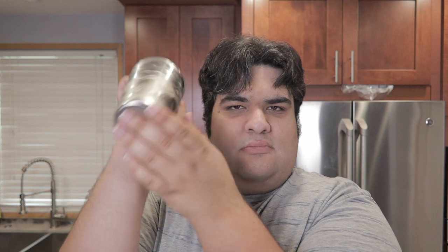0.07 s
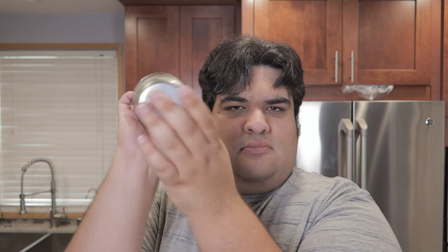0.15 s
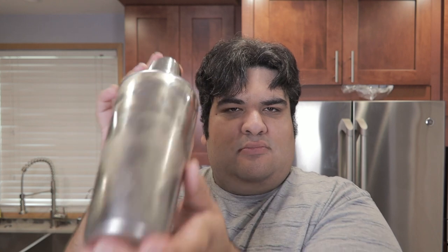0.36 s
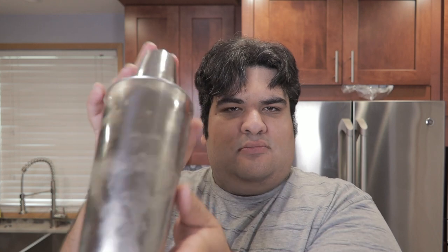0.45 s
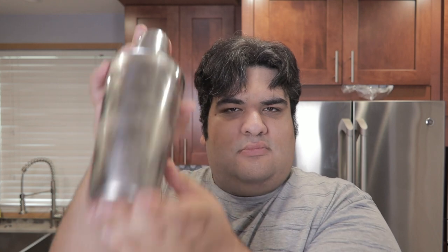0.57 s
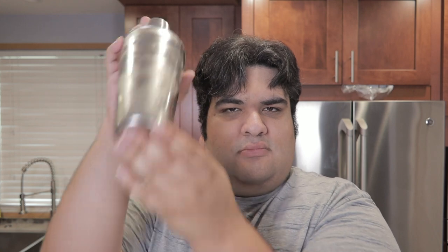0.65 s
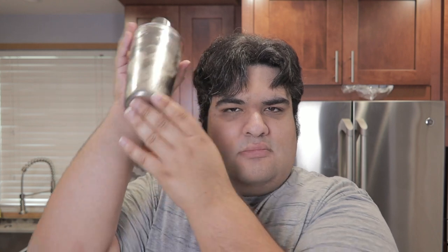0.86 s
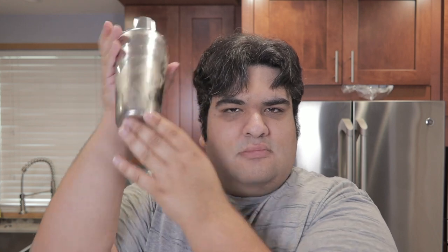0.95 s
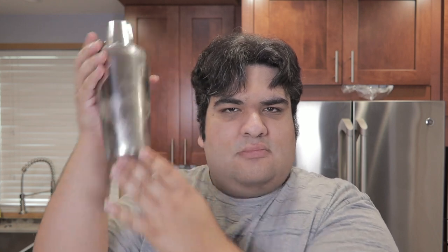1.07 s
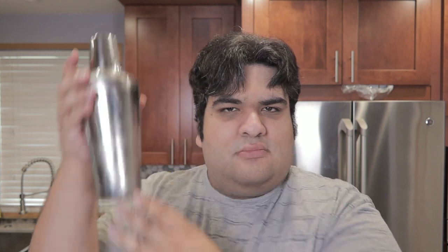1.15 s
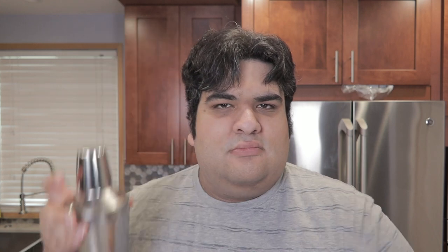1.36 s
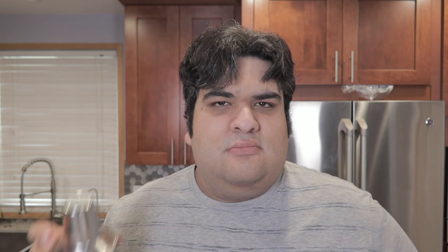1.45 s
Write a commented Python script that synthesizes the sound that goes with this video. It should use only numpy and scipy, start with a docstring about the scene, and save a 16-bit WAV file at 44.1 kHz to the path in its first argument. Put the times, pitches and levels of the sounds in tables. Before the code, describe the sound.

A metal cocktail shaker of ice is swung back and forth right by the microphone in a kitchen. Two loud, rattling crashes with a brief steel ring give way to softer clacks, over a faint hum.

```python
"""Kitchen, with the microphone close to a steel cocktail shaker full of ice, swung to and fro.
The ice crashes into one end and tumbles, slams into the ringing steel, then clacks about more gently.
Hard walls answer every hit; faint room noise and an appliance hum sit far behind.
At this distance the loudest slams overload the recorder."""
import sys
import numpy as np
from scipy import signal
from scipy.fft import rfft
from scipy.io import wavfile
from scipy.ndimage import uniform_filter1d

SR = 44100
rng = np.random.default_rng(int(sys.argv[2]) if len(sys.argv) > 2 else 0)


def store_wav(level_fs):
    """Save 16-bit WAV to argv[1]."""
    pcm = np.round(np.clip(np.atleast_2d(level_fs), -1, 1) * 32767)
    wavfile.write(sys.argv[1], SR, pcm.T.astype(np.int16))


N = 66150
LEAD_S = 0.1  # the mix starts early, so a slam is already ringing at time zero

# spectrum of the room noise: frequency_hz, gain_db
ROOM_SPECTRUM = [(20, -16.5), (40, -12.5), (57, 6), (70, -5), (120, -4.5), (180, -5.5), (280, 0.5),
                 (400, 3.5), (700, -9), (1600, -3), (4000, -10), (8000, -27.5), (16000, -35.5)]
# steady tones of a kitchen appliance: pitch_hz, level_db
APPLIANCE_TONES = [(58, -76), (120, -80.5), (236, -70), (290, -70)]
# reverberation of the kitchen: frequency_hz, t60_s, gain_db
REVERB_BANDS = [(120, 0.92, -19.5), (496, 0.29, -7.5), (1425, 0.47, -6.5), (3000, 0.42, -6.5),
                (3900, 0.55, -8.5), (4430, 0.52, -4.5), (7000, 0.47, -12), (11000, 0.3, -11),
                (14500, .3, -15)]
# dull low bumps under the shaking: start_s, length_s, level_db
LOW_BUMPS = [(.21, 0.13, -60.5), (.53, 0.069, -63), (1.2, .14, -65)]
# spectrum of a bump: frequency_hz, gain_db
BUMP_SPECTRUM = [(30, -29), (70, -15), (110, 3), (170, 0.5), (300, -28.5), (1000, -56)]
# loose ice tumbling after a throw: start_s, length_s, level_db, fade_db, treble_db
ICE_TUMBLES = [(0, 0.25, -41.5, -9, -1), (.212, 0.094, -26, -2, -1), (0.308, .15, -35.5, -6.5, 1),
               (.471, .034, -24, 2, -1.5), (0.848, 0.07, -44, -5, -11), (1.003, 0.12, -46, -10.5, -12.5),
               (1.328, .17, -52.5, -2, -12)]
# spectrum of tumbling ice: frequency_hz, gain_db
TUMBLE_SPECTRUM = [(60, -38), (200, -23.5), (450, -8.5), (680, -6), (830, 0.5), (1000, -2.5), (1500, -2.5),
                   (2200, 2), (3000, 1), (4200, 5), (5200, -5.5), (7500, -10), (10000, -14), (15500, -20.5)]
# ice hitting the shaker wall and other cubes: start_s, thud_db, knock_db, clink_db, crack_db, t60_s
ICE_CLACKS = [(0.0626, -33.5, -30.5, -37, -42.5, 0.017), (.0937, -46, -32.5, -32, -46, .008),
              (.122, -57.5, -47.5, -45, -50, .006), (0.1485, -35.5, -28, -29, -47, 0.0091),
              (.167, -49, -34, -34, -45.5, 0.016), (0.2012, -58, -34.5, -26, -39, 0.025),
              (.211, -33, -21.5, -16.5, -24.5, 0.018), (.216, -13.5, -17, -11, -18, 0.011),
              (0.229, -43, -30, -19, -25, 0.0072), (0.253, -46, -33, -30, -30, 0.0073),
              (0.2578, -24, -16.5, -17, -22.5, 0.0057), (.297, -31, -29, -33, -22, 0.01),
              (0.314, -50, -31, -23, -52, 0.013), (.376, -52, -27.5, -22.5, -34, .007),
              (0.4182, -50, -36.5, -21, -21, 0.0055), (0.425, -56, -43, -37, -31.5, .006),
              (.435, -48.5, -29.5, -33.5, -48, .009), (0.4573, -53.5, -43.5, -38.5, -29, .005),
              (.472, -36, -27, -17, -32, 0.012), (0.4833, -31, -18, -25, -24.5, .016),
              (.797, -43, -35.5, -42, -55, 0.014), (0.827, -37.5, -35, -44, -53, 0.012),
              (.835, -52, -36.5, -38, -51.5, 0.021), (.8545, -29, -29.5, -27, -43.5, 0.011),
              (0.8698, -38, -36, -35, -39.5, 0.015), (.874, -28, -28, -31.5, -44.5, 0.021),
              (.889, -51, -38, -33, -51, .009), (0.9636, -27, -23.5, -26, -41, 0.011),
              (.993, -47, -38, -36, -45, .009), (1.001, -44, -28, -30, -43.5, 0.02),
              (1.008, -51, -35, -40, -47, 0.014), (1.016, -51, -38, -25.5, -45, 0.017),
              (1.022, -29, -24.5, -32.5, -41, .018), (1.242, -47, -41, -53, -65, 0.013),
              (1.246, -50, -36, -53.5, -66, 0.016), (1.3288, -61, -34.5, -35.5, -44, 0.018),
              (1.339, -48, -38.5, -41.5, -53, 0.018), (1.384, -60, -39, -48, -57.5, 0.011),
              (1.3923, -50, -34, -39, -54, 0.02), (1.4111, -34, -25.5, -27, -42, .007),
              (1.425, -39, -36.5, -45, -56, 0.013), (1.447, -37.5, -38.5, -45, -57, 0.019),
              (1.459, -33, -33, -38.5, -48.5, 0.0071)]
# spectrum of a clack: frequency_hz, gain_db
CLACK_SPECTRUM = [(60, -24), (180, -27.5), (400, -0.5), (700, -6), (1200, -0.5), (1450, -2.5), (1700, 0),
                  (2300, -3), (3000, 1), (4200, -3.5), (5200, -5), (6400, -1.5), (7500, -1), (10000, -9),
                  (11600, -7), (15500, -17.5)]
# square hits that ring the steel: start_s, level_db, low_modes_db, pitch_ratio
ICE_SLAMS = [(-.03, -3, -13, .92), (0.4189, -15.5, -25, 0.99), (0.4607, -2, 4.5, 0.98),
             (0.4831, -7.5, 0.5, 0.97), (.4943, 0, -15.5, 0.97)]
# spectrum of the crack that starts a slam: frequency_hz, gain_db
CRACK_SPECTRUM = [(300, -3.5), (1200, 3.5), (2800, 7.5), (5000, 4.5), (8000, 0.5), (11000, -5),
                  (15000, -9.5)]
# modes of the steel shell: pitch_hz, mode_db, struck_t60_s, linger_db
STEEL_MODES = [(800, -25.5, 0.013, -33), (1925, -45, .012, -33), (2067, -11.5, 0.029, -29.5),
               (3030, -33, 0.0079, -21.5), (3666, -20, 0.042, -30), (3930, -13, 0.031, -31),
               (4020, -8.5, 0.022, -33), (4135, -11, 0.033, -24.5), (4185, -18.5, 0.021, -24.5),
               (4500, -26.5, .016, -22), (4740, -25.5, 0.0073, -18.5), (6320, -20, .008, -38.5),
               (6800, -18, 0.016, -36.5), (7250, -23, .008, -41)]


def amp(db):
    """Decibels to amplitude."""
    return 10 ** (np.asarray(db) / 20)


def unit_rms(x):
    """Scales to an rms of 1."""
    return x / np.sqrt(np.mean(x ** 2) + 1e-20)


def curve_at(points, hz, column=1):
    """Reads a table along a log-frequency axis."""
    table = np.transpose(points)
    return np.interp(np.log(hz + 1), np.log(table[0] + 1), table[column])


def decay(t, t60_s):
    """Exponential fall of 60 dB in t60_s."""
    return np.exp(-np.log(1000) * t / t60_s)


def wander(size, hz):
    """Smooth random motion up to about hz."""
    return unit_rms(signal.sosfilt(signal.butter(2, hz, fs=SR, output="sos"), rng.standard_normal(size)))


def low_cut(x, hz):
    """Second-order high-pass."""
    return signal.sosfilt(signal.butter(2, hz, "high", fs=SR, output="sos"), x)


def coloured(x, *curves, size=4096):
    """Minimum-phase filter with the sum of the (frequency_hz, gain_db) curves."""
    hz = abs(np.fft.fftfreq(size, 1 / SR))
    log_gain = np.log(amp(sum(curve_at(curve, hz) for curve in curves)))
    taps = np.fft.ifft(np.exp(np.conj(signal.hilbert(log_gain)))).real
    return signal.fftconvolve(x, taps[:size // 2])[:len(x)]


def flattened(burst):
    """Evens out a noise burst's broad spectrum, leaving its fine peaks."""
    hz = np.fft.rfftfreq(len(burst), 1 / SR)
    power = uniform_filter1d(abs(rfft(burst)) ** 2, 121)
    return coloured(burst, np.column_stack([hz, -10 * np.log10(power + 1e-12)]))


def room_tone(size, noise_db=-58, waver_rad=0.497):
    """Far behind the shaker: steady low room noise and the faint, wavering tones of an appliance."""
    t = np.arange(size) / SR
    hum = sum(amp(level_db) * unit_rms(np.sin(2 * np.pi * pitch_hz * t + waver_rad * wander(size, hz=3.6)))
              for pitch_hz, level_db in APPLIANCE_TONES)
    return hum + amp(noise_db) * unit_rms(coloured(rng.standard_normal(size), ROOM_SPECTRUM))


def kitchen_reverb(direct, wall_delay_s=0.0036, size=32768):
    """Hard walls send dense reflections back to the microphone, each band dying at its own speed."""
    t = np.arange(size) / SR
    hz, frame_s, bands = signal.stft(rng.standard_normal(size), SR, nperseg=256)
    t60_s = curve_at(REVERB_BANDS, hz)[:, None]
    gain = amp(curve_at(REVERB_BANDS, hz, column=2))[:, None]
    unit_energy = np.sqrt(2 * np.log(1000) / (t60_s * SR))
    bands *= decay(frame_s, t60_s) * gain * unit_energy
    tail = signal.istft(bands, SR, nperseg=256)[1][:size] * (t > wall_delay_s)
    return signal.fftconvolve(direct, tail)[:len(direct)]


def low_bump(length_s, level_db):
    """A soft swell of rumble under the shaking."""
    t = np.arange(0, length_s, 1 / SR)
    rumble = unit_rms(coloured(rng.standard_normal(SR // 4), BUMP_SPECTRUM))[:len(t)]
    return amp(level_db) * np.sin(np.pi * t / length_s) * rumble


def ice_tumble(length_s, level_db, fade_db, treble_db, ticks_per_s=1100, spread_db=1.5, timbres=8):
    """Loose ice makes many small collisions of uneven size, each a brief tick."""
    t = np.arange(SR // 4) / SR
    rattle = np.zeros(len(t))
    for _ in range(timbres):
        sizes = amp(spread_db * np.minimum(rng.exponential(1, len(t)), 4))
        hits = sizes * (rng.random(len(t)) < ticks_per_s / timbres / SR) * (t < length_s)
        tick = rng.standard_normal(len(t)) * decay(t, t60_s=0.0062)
        rattle += signal.fftconvolve(hits, tick)[:len(t)]
    rattle = coloured(rattle, TUMBLE_SPECTRUM, [(1800, 0.01), (6000, treble_db)])
    rattle = unit_rms(rattle) * np.sqrt(length_s / t[-1])  # rms near 1 while the ice moves
    return rattle * amp(level_db + fade_db * np.minimum(t / length_s, 1))


def ice_clack(thud_db, knock_db, clink_db, crack_db, t60_s, chatter_db=-16.5, gain_db=9.5):
    """A cube hits the hand-damped wall: dense modes die at once, with a short chatter after."""
    t = np.arange(4096) / SR
    envelope = decay(t, t60_s) + amp(chatter_db) * decay(t, t60_s=0.065)
    burst = np.linalg.norm(envelope) * flattened(rng.standard_normal(len(t)) * envelope)
    balance = [(600, thud_db), (1100, knock_db), (2000, knock_db),
               (2900, clink_db), (4200, clink_db), (6500, crack_db)]
    return amp(gain_db) * coloured(burst, CLACK_SPECTRUM, balance)


def ice_slam(level_db, low_modes_db, pitch_ratio, crack_db=-10, low_modes_below_hz=2600):
    """Ice hits squarely: a sharp crack, then the steel modes sound, are damped and linger unevenly."""
    t = np.arange(SR // 2) / SR
    crack = rng.standard_normal(len(t)) * decay(t, t60_s=0.0073)
    sound = amp(crack_db) * coloured(crack, CRACK_SPECTRUM)
    for pitch_hz, mode_db, struck_t60_s, linger_db in STEEL_MODES:
        phase = 2 * np.pi * pitch_hz * pitch_ratio * t
        struck = np.sin(phase) * decay(t, struck_t60_s)
        width_hz = 0.016 * pitch_hz
        shimmer = wander(len(t), width_hz) * np.sin(phase) + wander(len(t), width_hz) * np.cos(phase)
        linger = amp(linger_db) * shimmer * decay(t, t60_s=0.72) / np.sqrt(2)
        sound += amp(mode_db + low_modes_db * (pitch_hz < low_modes_below_hz)) * (struck + linger)
    return amp(level_db) * low_cut(sound, hz=534)  # the small shell radiates no bass


def scene():
    """At the microphone, in mono: the shaker up close, the kitchen's reflections and the room tone."""
    lead = round(LEAD_S * SR)
    shaker = np.zeros(lead + N)
    layers = (ice_clack, ICE_CLACKS), (ice_slam, ICE_SLAMS), (ice_tumble, ICE_TUMBLES), (low_bump, LOW_BUMPS)
    for source, events in layers:
        for start_s, *settings in events:
            sound = source(*settings)
            span = shaker[round((start_s + LEAD_S) * SR):][:len(sound)]
            span += sound[:len(span)]
    return (shaker + kitchen_reverb(shaker) + room_tone(len(shaker)))[None, lead:]


def record(dry, band_limit_hz=15800):
    """The recorder clips at full scale, then cuts the deep bass and the highest treble."""
    overloaded = np.clip(dry, -1, 1)
    low_pass = signal.firwin(511, band_limit_hz, window=("kaiser", 9), fs=SR)
    return signal.oaconvolve(low_cut(overloaded, hz=90), low_pass[None], "same")


dry = scene()
out = record(dry)
store_wav(out)
```